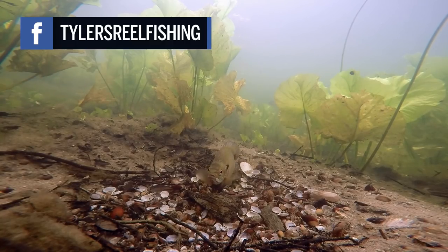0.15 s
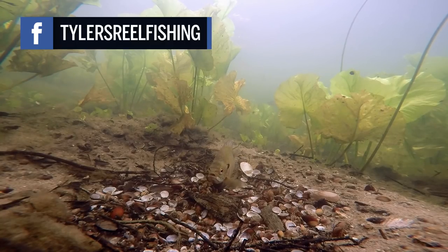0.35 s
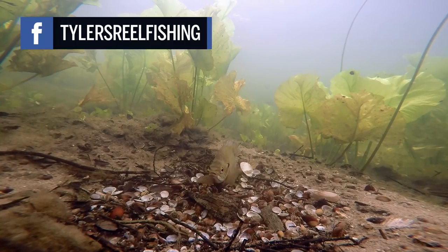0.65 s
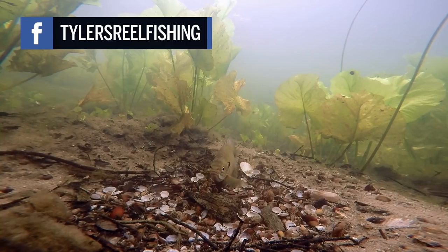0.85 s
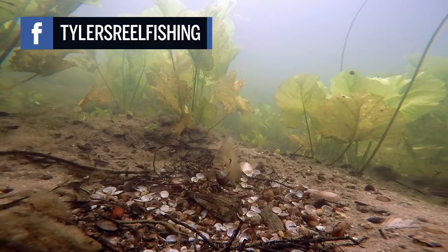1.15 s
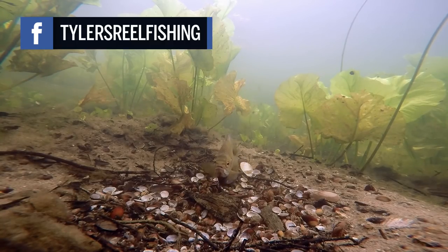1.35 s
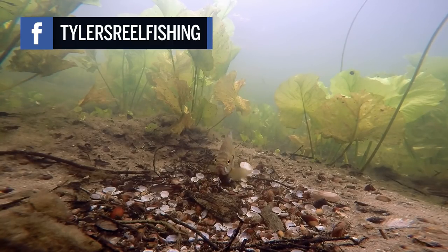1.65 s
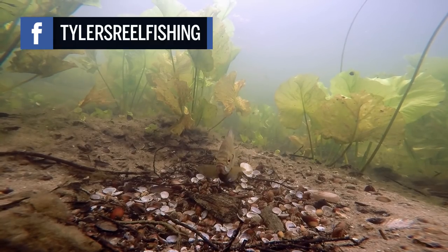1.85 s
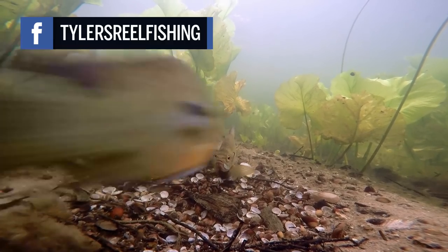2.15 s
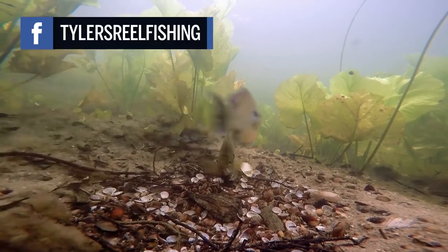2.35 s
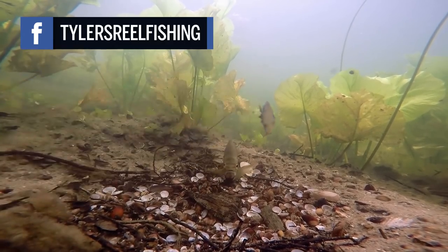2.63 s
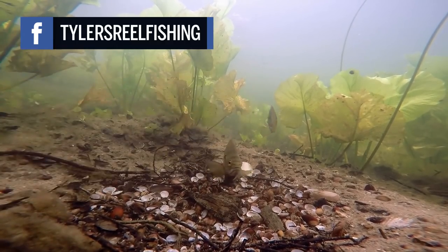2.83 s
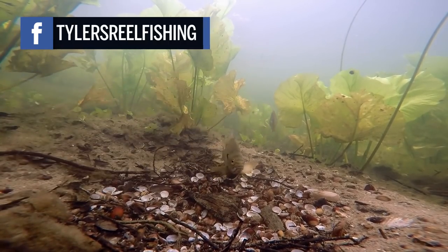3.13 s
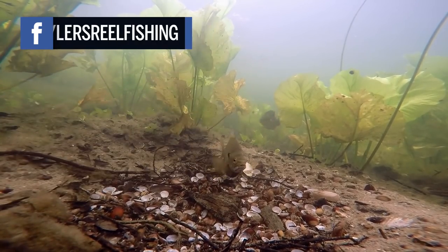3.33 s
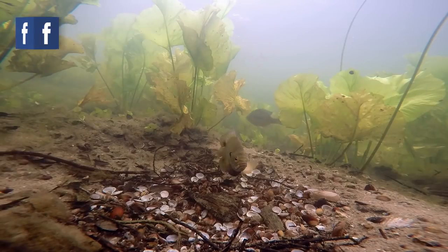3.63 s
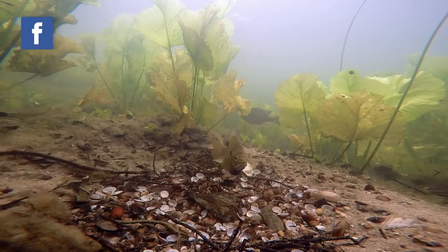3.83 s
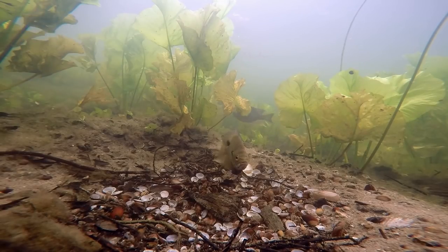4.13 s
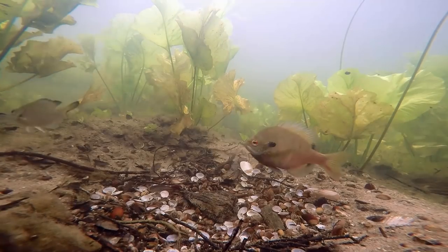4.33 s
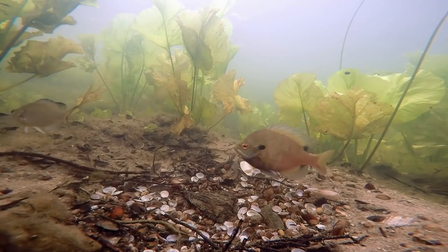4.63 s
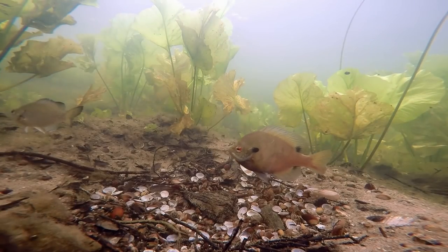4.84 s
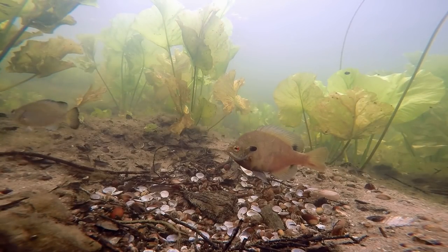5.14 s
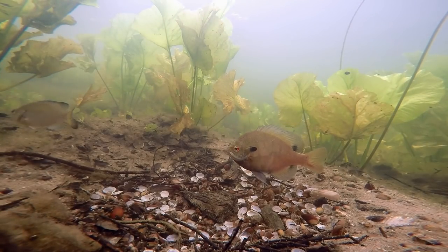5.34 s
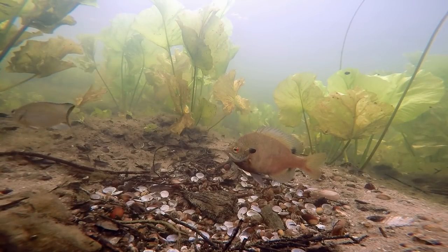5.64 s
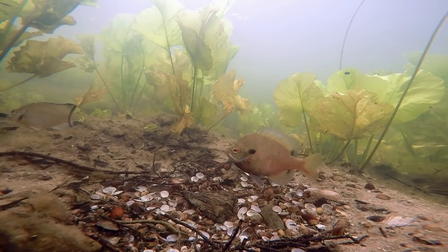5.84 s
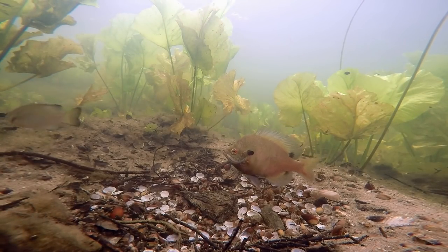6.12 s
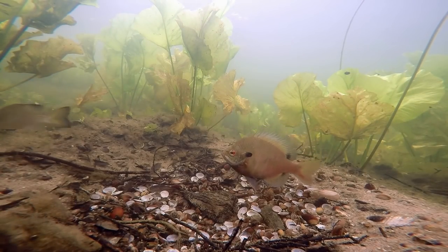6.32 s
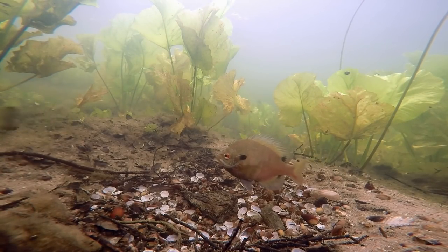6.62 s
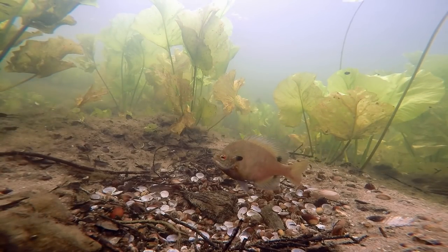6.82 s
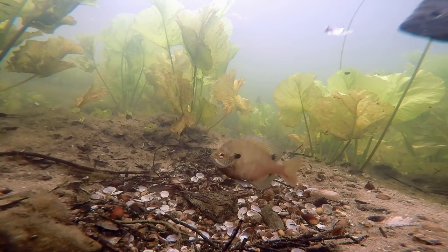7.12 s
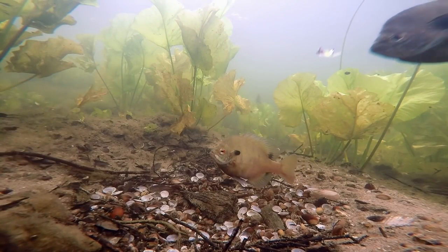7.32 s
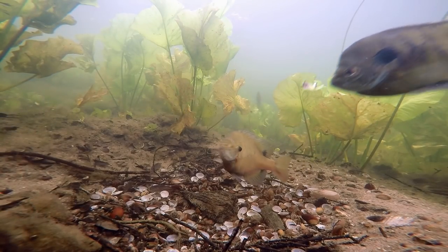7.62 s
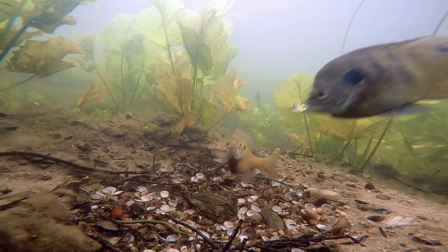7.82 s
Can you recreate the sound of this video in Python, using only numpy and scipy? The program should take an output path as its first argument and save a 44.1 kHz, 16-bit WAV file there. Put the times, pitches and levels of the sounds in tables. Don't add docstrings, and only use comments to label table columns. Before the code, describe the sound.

Inside a sealed housing on a pond bed: low water rumble, small taps, two dull fish knocks near two seconds, then one hard snap at the end.

```python
import sys
import numpy as np
from scipy import signal
from scipy.io import wavfile
from scipy.ndimage import uniform_filter1d

SR = 44100
rng = np.random.default_rng(int(sys.argv[2]) if len(sys.argv) > 2 else 0)


def inscribe(sig):
    pcm = np.round(np.clip(np.atleast_2d(sig).T, -1, 1) * 32767)
    wavfile.write(sys.argv[1], SR, pcm.astype(np.int16))


def makeup_ratio(level_db):
    decades = np.asarray(level_db, float) / 20
    return 10 ** decades


N = 351477


def evened(x):
    return x / np.sqrt(np.mean(x ** 2) + 1e-20)


def add(mix, start_s, sound):
    part = mix[round(start_s * SR):][:len(sound)]
    part += sound[:len(part)]


def band(x, lo_hz, hi_hz):
    sos = signal.butter(2, [lo_hz, hi_hz], "bandpass", fs=SR, output="sos")
    return signal.sosfilt(sos, x)


# frequency in Hz, density in dB per Hz.
HUSH_COLOUR = [(4.7, -32), (8.0, -8.5), (21, -1), (38, 0), (65, -8), (97, -10), (147, -16.5), (392, -24),
               (610, -26), (1630, -30), (5590, -32.5), (7200, -37), (8440, -37), (9280, -39.5),
               (15400, -41)]


def hush():
    stir_from_s, stir_rise_s, stir_peak_db, calm_db = 1.87, 0.26, 3, -.3
    size, hop = 4096, 1024
    frames, hz = N // hop + 5, np.fft.rfftfreq(size, 1 / SR)
    real, imaginary = rng.standard_normal((frames, len(hz), 2)).T
    colour_hz, colour_db = np.transpose(HUSH_COLOUR)
    level_db = np.interp(np.log(hz + 1), np.log(colour_hz + 1), colour_db)

    since = np.maximum(np.arange(frames) * hop / SR - stir_from_s, 0) / stir_rise_s
    stir_db = calm_db + stir_peak_db * since * np.exp(1 - since)
    patches = uniform_filter1d(rng.standard_normal((frames, len(hz))).T, size=9, axis=0)
    patches = uniform_filter1d(patches, size=5, axis=1)
    stir_db = stir_db + 1.43 * evened(patches)

    water_share = 1 / (1 + (hz / 400) ** 2)
    gain = makeup_ratio(level_db[:, None] + water_share[:, None] * stir_db)
    noise = signal.istft((real + 1j * imaginary) * gain, nperseg=size, noverlap=size - hop)[1]
    return makeup_ratio(-57.5) * evened(noise[:N])


# start in ms, length in ms, pitch in Hz, peak in dB.
WHINE_TONES = [
    (-2.6, 6, 8530, -74),
    (3.4, 8.8, 8530, -80.5),
    (12.2, 16, 14130, -84.5),
]
# centre in ms, pitch in Hz, buzz in dB, fizz in dB.
FRAME_TICKS = [
    (4.51, 5470, -71, -69),
    (13.4, 3670, -69.5, -71),
    (21.4, 4100, -80, -84),
    (28.9, 5900, -73, -72),
]


def whine():
    frame_s = 1001 / 30000
    period_ms = frame_s * 1000
    clock = np.arange(N) / SR / frame_s
    ms = clock % 1 * period_ms
    tone_clock = clock + .096
    tone_ms = tone_clock % 1 * period_ms
    slip, swell_db = rng.standard_normal((int(clock[-1]) + 2, 2))[tone_clock.astype(int)].T
    out = np.zeros(N)
    for start_ms, length_ms, hz, db in WHINE_TONES:
        is_on = (ms - start_ms) % period_ms < length_ms
        gate = uniform_filter1d(1. * is_on, size=30)
        out += makeup_ratio(db + swell_db) * gate * np.sin(2 * np.pi * hz * tone_ms / 1000 + .6 * slip)

    fizz = evened(band(rng.standard_normal(N), 4500, 16000))
    for centre_ms, hz, buzz_db, fizz_db in FRAME_TICKS:
        away_ms = (ms - centre_ms + period_ms / 2) % period_ms - period_ms / 2
        burst = np.exp(-.5 * (away_ms / 0.8) ** 2)
        buzz = np.sin(2 * np.pi * hz * away_ms / 1000 + 1.5 * away_ms ** 2)
        out += burst * (makeup_ratio(buzz_db) * buzz + makeup_ratio(fizz_db - 5) * fizz)
    return out


def strike(modes, peak_db, centre_hz, spread_octaves, build_ms, ring):
    t = np.arange(SR // 4) / SR
    hz, db, t60 = np.transpose(modes)[:, :, None]
    favour = np.exp(-.5 * (np.log2(hz / centre_hz) / spread_octaves) ** 2)
    rings = favour * makeup_ratio(db - 60 * t / (ring * t60)) * np.sin(2 * np.pi * hz * t)
    edges_hz = np.clip(centre_hz * 2 ** (1.3 * spread_octaves * np.array([-1, 1])), 30, 15000)
    splash = evened(band(rng.standard_normal(len(t)), *edges_hz))
    splash *= makeup_ratio(-20.0 - 60 * t / (0.012 + 8 / centre_hz))
    build_up = 1 - np.exp(-(t * 1000 / build_ms) ** 2)
    return -makeup_ratio(peak_db) * build_up * (rings.sum(0) + splash)


# pitch in Hz, level in dB, t60 in seconds.
HOUSING = [(116, -6, 0.11), (160.9, -5, 0.25), (203, -2.5, 0.065), (287, -5.5, 0.0576), (499, -6, 0.091),
           (560, -7, 0.016), (622, 2, 0.063), (667, -0.5, 0.032), (850, -25, 0.022), (996, 1, 0.043),
           (1240, -19, 0.022), (1450, -10.5, 0.013), (1710, -10, 0.017), (2110, -15, 0.0088),
           (2710, -26, 0.032), (3700, -7.5, 0.017), (4480, -15, 0.025), (5950, -16, 0.0065),
           (7650, -25, 0.019), (11100, -25, .008)]
# start in seconds, peak in dB, favoured pitch in Hz.
GRIT = [(.0244, -60, 620), (.043, -54, 600), (.379, -42, 170), (.4165, -52, 550), (.4165, -55, 1020),
        (.4165, -45, 1430), (.576, -34, 150), (.6281, -55, 600), (.6824, -50, 470), (.6826, -42, 1680),
        (.7234, -50, 545), (.7254, -35, 1340), (1.373, -60, 1000), (1.657, -56, 650), (1.9513, -58, 700),
        (2.2639, -58, 550), (2.288, -50, 624), (2.35, -53, 640)]


def grit(peak_db, hz):
    high = hz / 600
    return strike(HOUSING, peak_db, hz, .17, build_ms=2.03 / high ** .6, ring=0.58 * high ** 0.62)


# start in seconds, peak in dB, pitch in Hz, build-up in ms.
RUBS = [
    (.5755, -34, 565, 2),
    (1.646, -29, 1450, 8),
    (2.0975, -25, 560, 3),
    (2.175, -42, 565, 4),
    (2.3715, -42, 565, 3),
]


def rub(peak_db, hz, build_ms):
    return strike(HOUSING, peak_db, hz, .05, build_ms, ring=1.8 + .16 * build_ms)


# start in seconds, peak in dB, favoured pitch in Hz,
# spread in octaves, build-up in ms.
BLOWS = [(1.628, -26, 1370, .13, 1.5), (1.6285, -50, 620, .15, 2), (1.598, -30.5, 272, 0.43, 4.9),
         (2.03, -19, 270, .28, 8), (2.047, -16, 253, 0.32, 4.4), (2.059, -17, 225, .35, 5.3),
         (2.055, -42, 560, .4, 8), (2.081, -48, 1300, 1.2, 1.5), (2.0965, -23, 1470, 1.39, 0.35),
         (2.098, -19.5, 600, .42, 4.6), (2.1, -17, 140, .3, 3.9), (2.0963, -19.5, 1980, 0.15, .3),
         (2.097, -25, 850, .08, 1.5)]


def blow(peak_db, hz, spread_octaves, build_ms):
    return strike(HOUSING, peak_db, hz, spread_octaves, build_ms, ring=.95 * (hz / 600) ** -.08)


# start in seconds, peak in dB, sway in Hz (negative: pulled),
# t60 in seconds, wake in dB.
SHOVES = [
    (1.6, -21.5, 45.5, 0.1, -38),
    (1.627, -32.5, 51, 0.19, -43),
    (1.702, -32, 24, .12, -60),
    (2.0355, -1.5, 36, .15, -31),
    (2.102, -18.5, -30.5, 0.21, -48),
    (2.223, -33.5, 26, 0.18, -63),
    (2.056, -6, 20, .07, -50),
]


def shove(peak_db, hz, t60, wake_db):
    t = np.arange(SR // 2) / SR
    quick = 0.67 + 0.03 * peak_db if hz > 0 else .1
    turns = np.cumsum(hz * (1 + quick * np.exp(-t / .007))) / SR
    onset = 1 - np.exp(-(t * hz / 0.36) ** 2)
    sway = makeup_ratio(peak_db - 60 * t / t60) * onset * np.sin(2 * np.pi * turns)
    eddies = evened(band(band(rng.standard_normal(len(t)), 40, 160), 40, 160))
    return sway + makeup_ratio(wake_db - 60 * t / (1.34 * t60)) * (1 - np.exp(-t / .01)) * eddies


# pitch in Hz, level in dB, t60 in seconds.
SHELL = [(1214, -9, 0.052), (1427, 0, 0.029), (1880, -17, .022), (2420, -9, 0.024), (2680, -1.5, 0.0081),
         (3950, -3.5, 0.015), (4450, -5, 0.015), (5100, -8, .008), (5740, -2, 0.01), (7200, -5.5, 0.012)]
# start in seconds, ring in dB, favoured pitch in Hz, spread in octaves,
# crack in dB.
SNAP = [
    (7.8712, -22.5, 1650, 0.65, -15.5),
    (7.881, -22, 3000, 0.36, -30),
    (7.8806, -46, 5000, 0.3, -40),
    (7.8712, -52, 5000, 0.45, -46),
    (7.8817, -32.5, 4000, 0.31, -50),
    (7.8922, -41, 2500, .3, -58),
    (7.8945, -46, 5800, .15, -65),
    (7.9003, -43, 6800, 0.16, -45),
    (7.9, -39, 4100, 0.18, -50),
    (7.9083, -47, 7300, .15, -65),
]


def click(ring_db, centre_hz, spread_octaves, crack_db):
    ring = strike(SHELL, ring_db, centre_hz, spread_octaves, build_ms=0.35, ring=0.87)
    cycles = np.arange(len(ring)) / SR * centre_hz * 1.18 - 1.2
    crack = np.exp(-.5 * ((cycles - .22) / 0.49) ** 2) * np.sin(-2 * np.pi * cycles)
    return band(band(ring + makeup_ratio(crack_db) * crack, 1030, 11000), 990, 11000)


def scene():
    mix = hush() + whine()
    for table, source in [(GRIT, grit), (RUBS, rub), (BLOWS, blow), (SHOVES, shove), (SNAP, click)]:
        for start_s, *settings in table:
            add(mix, start_s, source(*settings))
    return mix[None]


def top_cut(x):
    return signal.sosfilt(signal.butter(12, 15540, fs=SR, output="sos"), x)


def record(dry):
    return top_cut(dry)


dry = scene()
out = record(dry)
inscribe(out)
```